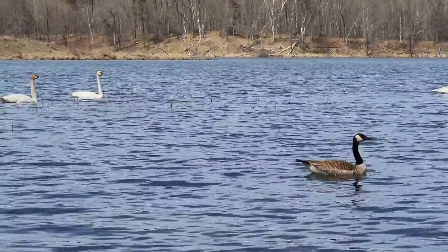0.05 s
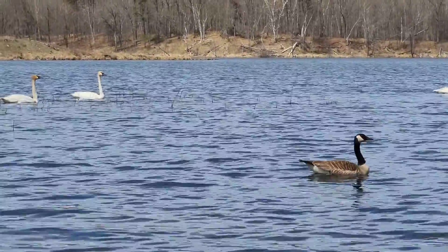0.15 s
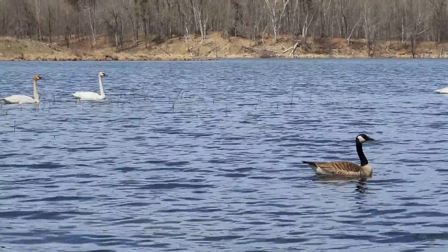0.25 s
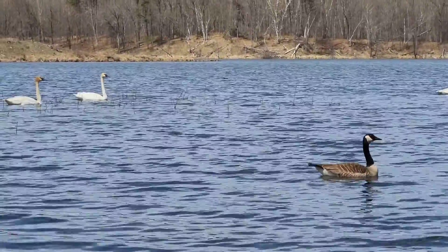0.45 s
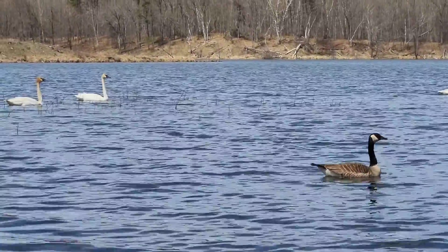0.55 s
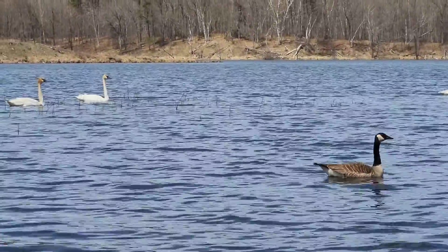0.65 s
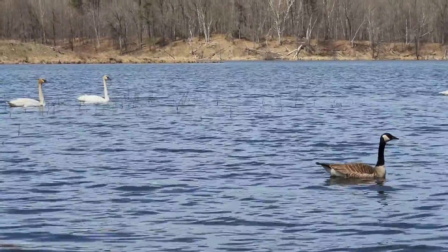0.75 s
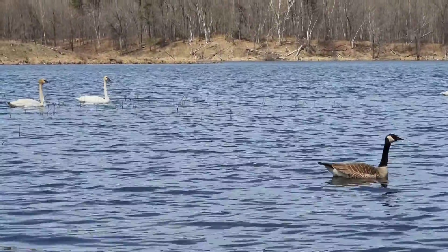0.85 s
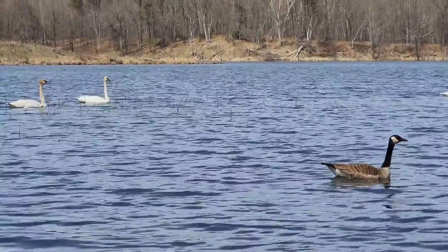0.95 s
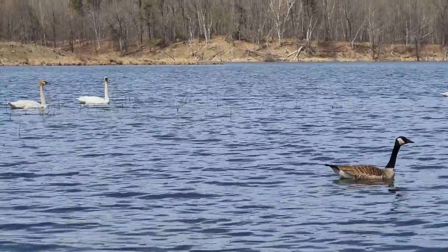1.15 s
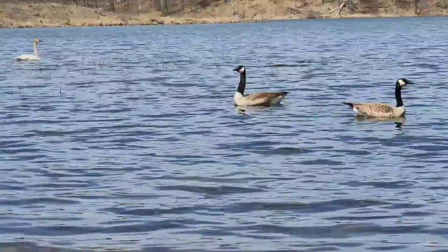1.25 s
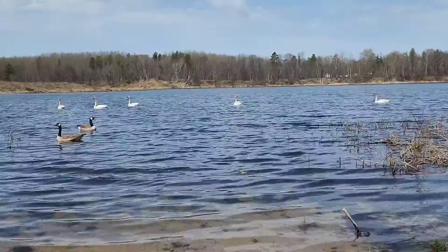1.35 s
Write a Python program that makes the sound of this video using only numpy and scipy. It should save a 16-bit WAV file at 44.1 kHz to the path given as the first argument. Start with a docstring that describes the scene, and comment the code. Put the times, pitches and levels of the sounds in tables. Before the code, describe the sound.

A goose gives one two-part honk on a lake after a low gust of wind.

```python
"""First comes a gust of wind, building up and buffeting the microphone, mostly on the right.
A small bird whistles far away. As the gust drops, a waterfowl on an open lake gives the main sound,
one two-part honk: a rasping note, then a cleaner, softer one. Its voice organ snaps hundreds of
times a second and its throat and bill shape the buzz. The wooded shore answers faintly,
and ripples and air hiss underneath."""
import sys
import numpy as np
from scipy import signal
from scipy.fft import rfft, irfft, next_fast_len
from scipy.io import wavfile
from scipy.ndimage import uniform_filter1d, map_coordinates

SR = 44100
rng = np.random.default_rng(int(sys.argv[2]) if len(sys.argv) > 2 else 0)


def unload_wav(signal):
    """Save mono or channel-first audio to the path in sys.argv[1] as 16-bit WAV at rate SR, clipped to [-1, 1]."""
    wavfile.write(
        sys.argv[1],
        SR,
        np.round(np.clip(np.atleast_2d(signal).T, -1, 1) * 32767).astype(np.int16),
    )


N = 61739
T = np.arange(N) / SR

# the course of each note (time [s], pitch [Hz], tone level [dB], buzz level [dB])
RASP_NOTE = [(.8845, 340.9, -57.5, -62), (.891, 341.3, -43, -56.5), (.903, 345.3, -36.5, -48.5),
             (.925, 350.8, -32.5, -46), (.96, 352.8, -29.5, -43), (.988, 348.6, -31.5, -45.5),
             (1.002, 342, -36.5, -46.5), (1.016, 332.2, -45.5, -59), (1.028, 319, -52.5, -65.5),
             (1.038, 307.4, -99, -77)]
CLEAR_NOTE = [(1.04, 317.7, -63, -70), (1.05, 325.7, -42, -61), (1.062, 335, -39, -51),
              (1.078, 341, -34.5, -49), (1.1, 342.8, -38, -46), (1.125, 341.8, -40.5, -49),
              (1.152, 336.7, -42, -49.5), (1.17, 323, -48, -59.5), (1.185, 295, -53.5, -60),
              (1.215, 285.8, -67.5, -69)]
# how the throat boosts or weakens the three lowest harmonics (frequency [Hz], gain [dB])
RASP_TONE_SHAPE = [(310, 11), (353, -8.5), (640, 8.5), (705, 1), (950, 5.5), (1030, -3), (1060, -12.5)]
CLEAR_TONE_SHAPE = [(295, 7.5), (345, -2), (600, -8.5), (685, -1.5), (900, -8), (1030, -16)]
# how the throat and bill colour the buzz (frequency [Hz], gain [dB])
RASP_BUZZ_SHAPE = [(900, -45.5), (1200, -8.5), (1400, -16), (1550, -15.5), (1750, 1), (2100, -5.5),
                   (2750, -2.5), (3150, -14), (3900, -5), (4500, -4.5), (5800, -8.5), (6800, -20.5),
                   (7650, -25), (8300, -36.5), (11800, -41), (15000, -55)]
CLEAR_BUZZ_SHAPE = [(900, -58), (1370, -5.5), (1720, 1), (2050, -3), (2400, 5), (2750, -3.5), (3400, -0.5),
                    (3780, 5.5), (4450, 3.5), (4850, -3.5), (5500, -14), (6400, -6), (7500, -21),
                    (8600, -35), (9600, -23), (11200, -18), (13000, -28), (15500, -39.5)]
# roughness from breath and a second, slower vibration, the flutter (time [s], rate [share of pitch],
# swing in snap size [dB], swing in snap timing [rad], side tones vs tone [dB], breath vs snaps [dB])
RASP_FLUTTER = [(.885, .333, 1.5, .15, -8, 0), (.9, .333, 4, .17, -9, -5), (.912, .333, 7, .17, -9, -9),
                (.928, .333, 7, .17, -11, -10), (.938, .3, 2.5, .24, -15, -11),
                (.98, .3, 2.2, .25, -19, -11), (1, .3, 3, .25, -15, -9), (1.02, .3, 3, .25, -12, -3)]
CLEAR_FLUTTER = [(1.045, .45, 3, .2, -14, 2), (1.063, .45, 2, .12, -21, -4), (1.08, .45, 0, 0, -45, -22),
                 (1.145, .45, 0, 0, -45, -22), (1.16, .45, 1, .04, -30, -12), (1.175, .45, 3, .2, -18, 0)]
# side tones between the harmonics (harmonic [number], offset [times the flutter rate], level [dB])
RASP_SIDE_TONES = [(2, -1, -2), (2, 1, 1.5), (3, -1, 0), (3, -2, -9)]
CLEAR_SIDE_TONES = [(2, -1, -8), (2, 1, -2), (3, -1, 0), (3, 1, -12)]
# how much louder each note is on the left (frequency [Hz], left vs right [dB])
RASP_BALANCE = [(350, 1), (700, 2.5), (820, -2.5), (950, 3), (1060, -3), (1400, 13.5), (1750, 1),
                (2100, 21), (2450, -10), (2800, 17.5), (3400, 7.5), (4000, 0.5), (5200, -1), (6000, -3.5),
                (7500, -3.5), (11000, 3)]
CLEAR_BALANCE = [(350, 0.5), (700, 2.5), (1030, -0.5), (1400, 10), (1720, 3.5), (2100, 17), (2450, 5),
                 (2800, 23.5), (3400, -1.5), (3800, 4.5), (4500, -6.5), (5200, 4), (6200, -8), (7500, -15),
                 (11000, 4.5)]


def honk():
    """The waterfowl calls: a rasping, unsteady note, then a clear, steadier one."""
    rasp = voice(RASP_NOTE, RASP_TONE_SHAPE, RASP_BUZZ_SHAPE, RASP_FLUTTER, RASP_SIDE_TONES,
                 pitch_jitter=.003, timing_jitter_rad=.05, size_jitter_db=1.2)
    clear = voice(CLEAR_NOTE, CLEAR_TONE_SHAPE, CLEAR_BUZZ_SHAPE, CLEAR_FLUTTER, CLEAR_SIDE_TONES,
                  pitch_jitter=.0012, timing_jitter_rad=.004, size_jitter_db=.25)
    return to_stereo(rasp, RASP_BALANCE) + to_stereo(clear, CLEAR_BALANCE)


def voice(note, tone_shape, buzz_shape, flutter, sides, pitch_jitter, timing_jitter_rad, size_jitter_db):
    """The voice organ snaps once a cycle, making a low tone and a buzz; the flutter roughens both."""
    pitch, tone_db, buzz_db = curves(note)
    flutter_share, swing_db, swing_rad, side_db, breath_db = curves(flutter)
    on = during(note)
    pitch = pitch * (1 + pitch_jitter * wobble(200))
    phase = phase_of(pitch * on)
    flutter_phase = phase_of(pitch * flutter_share * on)
    tone = sum(amp(along(tone_shape, k * pitch)) * np.sin(k * phase) for k in range(1, 4))
    tone += sum(amp(side_db + db) * np.sin(k * phase + j * flutter_phase) for k, j, db in sides)
    snap_size = amp(swing_db * (np.cos(flutter_phase) + .4 * np.cos(2 * flutter_phase)))
    snap_size /= np.sqrt(uniform_filter1d(snap_size ** 2, size=800))  # keep the average level even
    snap_size *= amp(size_jitter_db * wobble(350))
    snaps = pulses(phase + swing_rad * np.sin(flutter_phase) + timing_jitter_rad * wobble(350))
    breath = amp(breath_db) * unit(rng.standard_normal(N) * (1 + np.cos(phase)))  # a puff each cycle
    source = (snaps + breath) / np.sqrt(1 + amp(breath_db) ** 2)
    buzz = unit(colour(source * snap_size * on, buzz_shape)) * np.sqrt(on.mean())
    dull = muffle(buzz, edge_hz=3600, steepness=4)
    brightness = amp(.65 * (buzz_db - buzz_db.max()))  # less effort, less treble
    buzz = dull + brightness * (buzz - dull)
    return on * (amp(tone_db) * np.sqrt(2) * tone + amp(buzz_db) * buzz)


# how far the honk's wave is ahead on the left (frequency [Hz], lead [rad])
LEFT_LEAD = [(350, .1), (700, 0.22), (1050, 0.84), (2240, 2.2), (2580, 0.39), (3700, 0.85), (6900, 0.15),
             (8100, 1.6), (11000, 1.7)]


def to_stereo(x, balance):
    """The call reaches the microphone's two openings with different strength and timing."""
    half = np.array([[.5], [-.5]])
    return filtered(x, lambda hz: amp(half * along(balance, hz))
                    * np.exp(1j * half * along(LEFT_LEAD, hz)))


# the strength of the gust on the right (time [s], level [dB])
GUST = [(0, -38), (.18, -42.5), (.23, -27), (.29, -40.5), (.33, -22.5), (.39, -29), (.44, -28), (.635, -25),
        (.654, -15), (.76, -16), (.85, -14), (.885, -32), (.98, -33), (1.08, -34.5), (1.22, -46),
        (1.27, -31.5), (1.35, -37)]
# the deep colour of wind on the microphone (frequency [Hz], relative level [dB])
RUMBLE_COLOUR = [(12, -22), (25, -9), (42, -1), (65, -2), (92, 1), (130, -7.5), (180, -14), (250, -29.5),
                 (400, -48), (800, -55), (2000, -97.5)]


def wind_rumble(calm_db=-43, left_share=.6, likeness=.35):
    """The gust buffets both openings; the left rumble is partly alike and swells less."""
    right_db, = curves(GUST)
    left_db = calm_db + left_share * (right_db - calm_db)
    unrelated, right = noise(RUMBLE_COLOUR)
    left = likeness * right + np.sqrt(1 - likeness ** 2) * unrelated
    return amp([left_db, right_db]) * np.array([left, right])


# the strength of swirling air on the right (time [s], level [dB])
SWIRL_LEVEL = [(0, -66), (.25, -69), (.45, -50), (.6, -40), (.66, -42), (.84, -43), (.89, -70.5),
               (1.2, -68.5), (1.27, -44), (1.35, -49)]
# the colour of its hiss (frequency [Hz], relative level [dB])
SWIRL_COLOUR = [(120, -12), (250, 7), (450, -2), (700, -13.5), (1200, -34), (1800, -45), (3000, -61.5)]
# soft pops of air (time [s], level before muffling [dB], muffled above [Hz])
POPS = [(.574, -35, 900), (.632, -26, 850), (.6645, -22, 1300), (.7035, -24, 1000), (.7315, -28, 1000),
        (.8015, -28, 1700), (.82, -34, 1500), (.843, -26, 1600)]


def wind_swirls(left_db=-30.5, pop_s=.001):
    """Swirling air hisses unevenly and pops in the exposed right opening, barely in the left."""
    swirl_db, = curves(SWIRL_LEVEL)
    hiss = amp(swirl_db) * unit(noise(SWIRL_COLOUR) * amp(4.5 * wobble(70)))
    pops = np.zeros(N)
    for start, db, edge_hz in POPS:
        age = np.maximum(T - start, 0) / pop_s
        pop = amp(db) * (T >= start) * (1 - age) * np.exp(-age)  # a push, then a weaker pull
        pops += muffle(pop, edge_hz, steepness=6)
    return amp([[left_db], [0]]) * (hiss + pops)


# four whistles, one list of points each (time [s], pitch [Hz], level [dB])
WHISTLES = [
    [(.132, 3040, -81), (.143, 3440, -68.5), (.153, 3600, -83.5)],
    [(.172, 3810, -89.5), (.185, 3720, -80.5), (.22, 3700, -77), (.265, 3490, -77), (.3, 3520, -86.5)],
    [(.22, 2730, -76), (.24, 2430, -77.5), (.26, 2380, -73.5), (.3, 2498, -72), (.345, 2550, -82.5)],
    [(.285, 2050, -90.5), (.31, 1920, -81.5), (.33, 2080, -80.5), (.365, 1860, -88)],
]


def songbird():
    """Thin gliding whistles from the trees, wavering a little in level and pitch."""
    song = np.zeros(N)
    for whistle in WHISTLES:
        pitch, db = curves(whistle)
        loudness = during(whistle) * amp(db + 2.2 * wobble(60))
        pitch = pitch * (1 + .0067 * wobble(120))
        song += loudness * np.sqrt(2) * np.sin(phase_of(pitch))
    return song


# how long the shore's echo lasts (frequency [Hz], time to fade by 60 dB [s])
ECHO_FADE = [(300, 2.4), (2500, 1.1), (6000, 3), (12000, 1.2)]
# the colour of the echo (frequency [Hz], gain [dB])
ECHO_COLOUR = [(300, -8.5), (700, -13.5), (1100, -8.5), (2200, 3), (4500, -6), (9000, -3.5)]


def shore_echo(x, delay_s=.012):
    """The wooded shore scatters sound back as a smooth, fading tail."""
    hz, t, spectrum = signal.stft(rng.standard_normal((2, SR)), SR, nperseg=256)
    fade = amp(-60 * t / along(ECHO_FADE, hz)[:, None])
    _, tail = signal.istft(spectrum * fade, SR, nperseg=256)
    tail = np.pad(tail / np.linalg.norm(tail[0]), ((0, 0), (int(delay_s * SR), 0)))
    return colour(signal.fftconvolve(x[None], tail, axes=1)[:, :N], ECHO_COLOUR)


# the colour of the lake's hiss (frequency [Hz], relative level [dB])
LAKE_COLOUR = [(100, 8.5), (300, 9), (600, -7.5), (1100, -11.5), (2500, -17), (4500, -20), (6300, -17.5),
               (7800, -22), (9000, -32.5), (10500, -45.5), (12000, -33), (15500, -33.5)]


def lake(level_db=-57.5, lean_right_db=.5):
    """Ripples and air make a faint, steady hiss."""
    return amp([[level_db - lean_right_db], [level_db + lean_right_db]]) * noise(LAKE_COLOUR)


def amp(db):
    """Turn decibels into a multiplier."""
    return 10 ** (np.asarray(db) / 20)


def unit(x):
    """Scale each channel to an average power of 1."""
    return x / np.sqrt(np.mean(x ** 2, axis=-1, keepdims=True) + 1e-20)


def along(points, hz):
    """Read between (frequency, value) points, with octaves evenly spaced."""
    frequencies, values = np.transpose(points)
    return np.interp(np.log(hz + 1), np.log(frequencies + 1), values)


def curves(rows):
    """One value per sample for each column after the time."""
    times, *columns = np.transpose(rows)
    return [np.interp(T, times, column) for column in columns]


def during(rows):
    """1 while the table lasts, else 0."""
    return (T >= rows[0][0]) & (T <= rows[-1][0])


def wobble(rate):
    """A smooth curve through `rate` random values a second."""
    return map_coordinates(rng.standard_normal(int(N * rate / SR) + 4), [T * rate])


def phase_of(hz):
    """The angle a vibration has turned through so far."""
    return 2 * np.pi * np.cumsum(hz) / SR


def pulses(phase, count=46):
    """Stack harmonics (multiples of the pitch) into one sharp pulse per cycle."""
    return sum(np.cos(k * phase) for k in range(1, count)) * np.sqrt(2 / count)


def colour(x, points):
    """Shape x by (frequency, gain) points, so that it rings after each sound, never before."""
    size = 2 * next_fast_len(N)
    gain = amp(along(points, np.fft.rfftfreq(size, 1 / SR)))
    cepstrum = irfft(np.log(gain), size)
    cepstrum[1:size // 2] *= 2  # move the early half of the ringing onto the late half
    cepstrum[size // 2 + 1:] = 0
    return irfft(rfft(x, size) * np.exp(rfft(cepstrum)), size)[..., :N]


def filtered(x, response):
    """Multiply each frequency in x by response(hz)."""
    size = 2 * next_fast_len(N)
    return irfft(rfft(x, size) * response(np.fft.rfftfreq(size, 1 / SR)), size)[..., :N]


def muffle(x, edge_hz, steepness):
    """Turn down the treble above edge_hz."""
    return filtered(x, lambda hz: 1 / (1 + (hz / edge_hz) ** steepness))


def noise(spectrum):
    """Unrelated left and right noise of the given colour, at power 1."""
    return unit(filtered(rng.standard_normal((2, N)), lambda hz: amp(along(spectrum, hz))))


def scene():
    """Honk and songbird with their echoes, over wind and water."""
    call, song = honk(), songbird()
    echo = shore_echo(amp(-12.5) * call.mean(axis=0) + amp(-.5) * song)
    return call + song + echo + wind_rumble() + wind_swirls() + lake()


def record(dry, stop_s=1.35, top_hz=15750):
    """The sound stops short, and the very highest treble is cut away."""
    fade_out = np.clip((stop_s - T) / .002, 0, 1)
    return filtered(dry * fade_out, lambda hz: hz < top_hz)


dry = scene()
out = record(dry)
unload_wav(out)
```